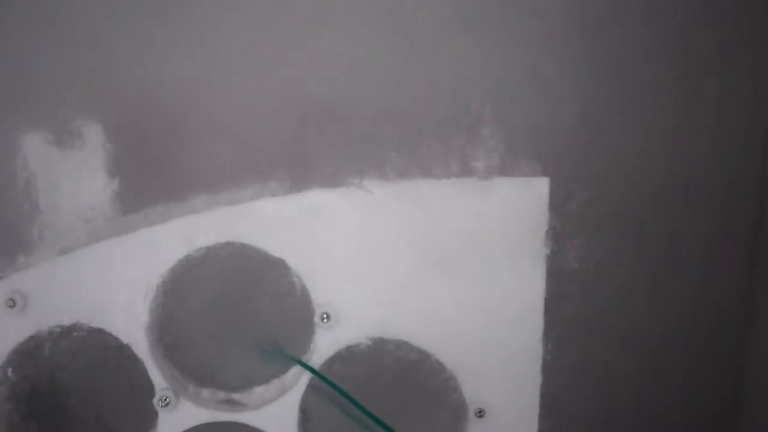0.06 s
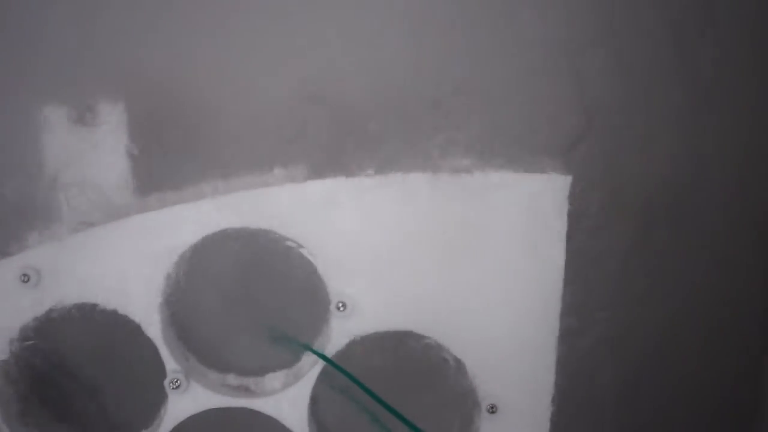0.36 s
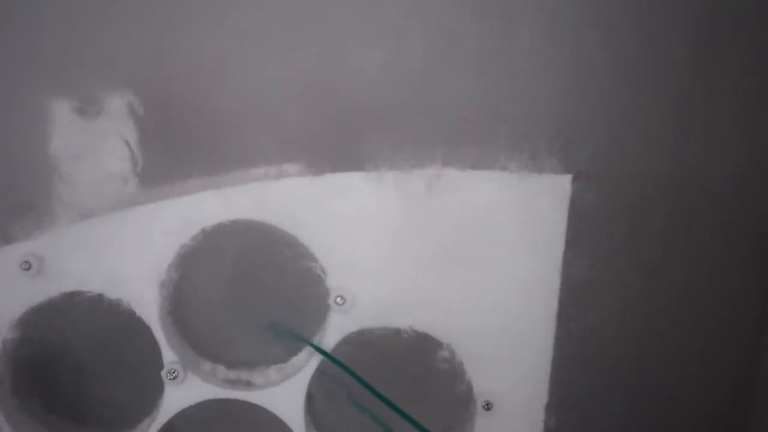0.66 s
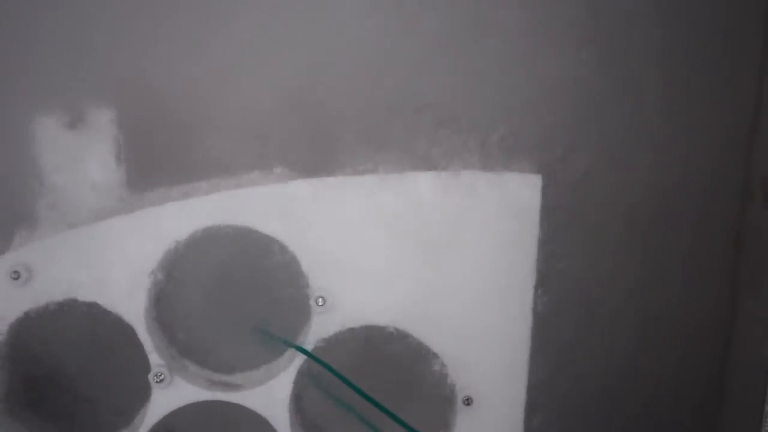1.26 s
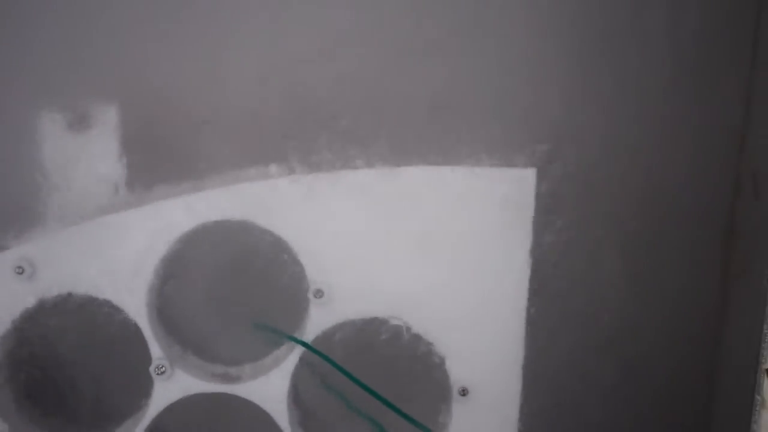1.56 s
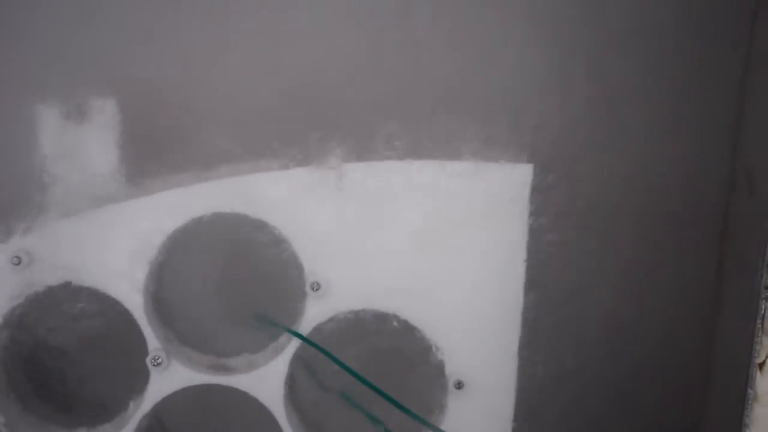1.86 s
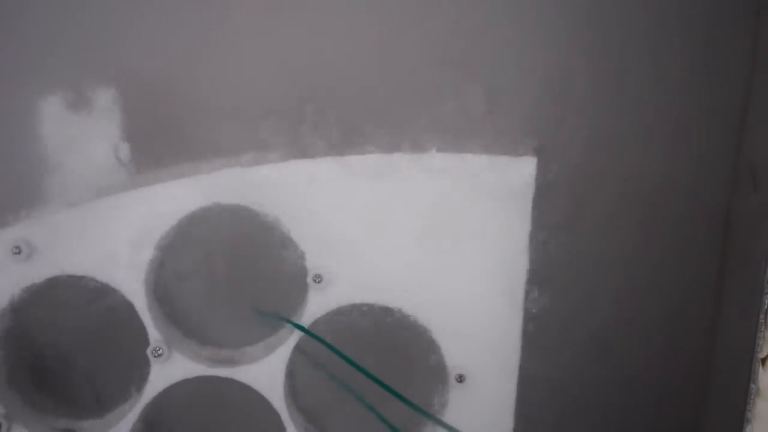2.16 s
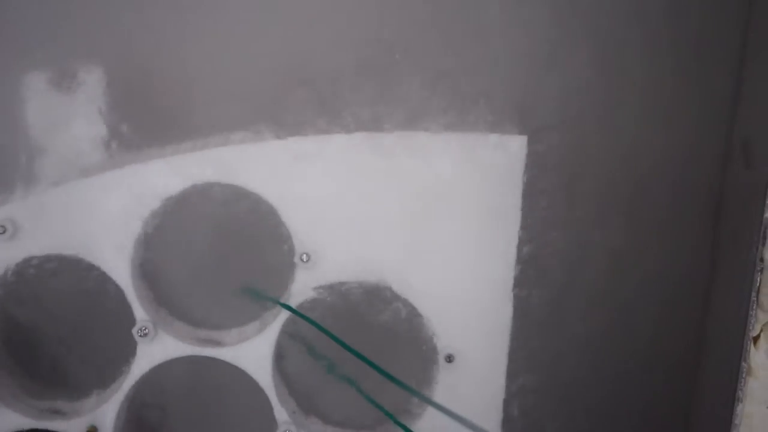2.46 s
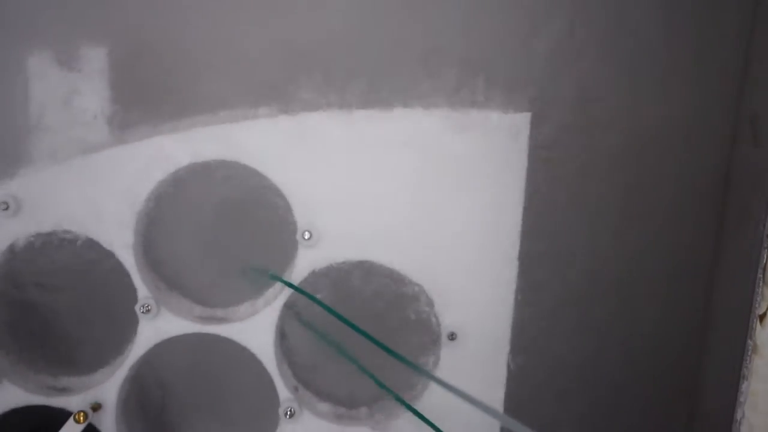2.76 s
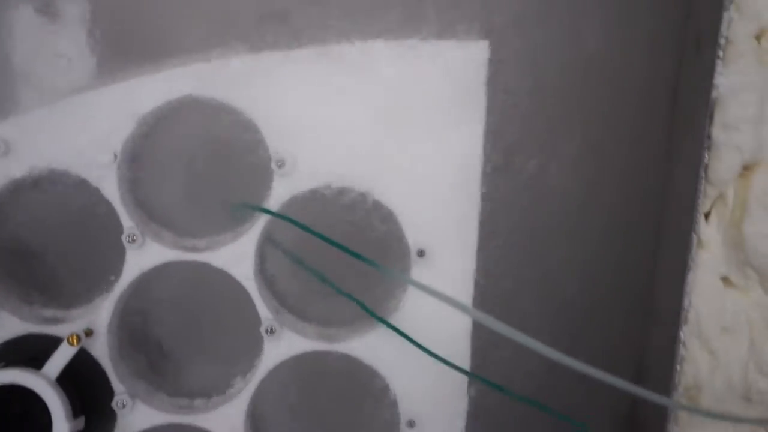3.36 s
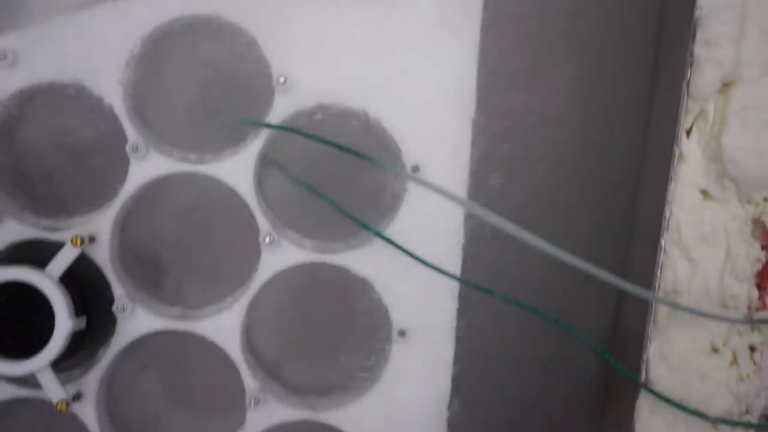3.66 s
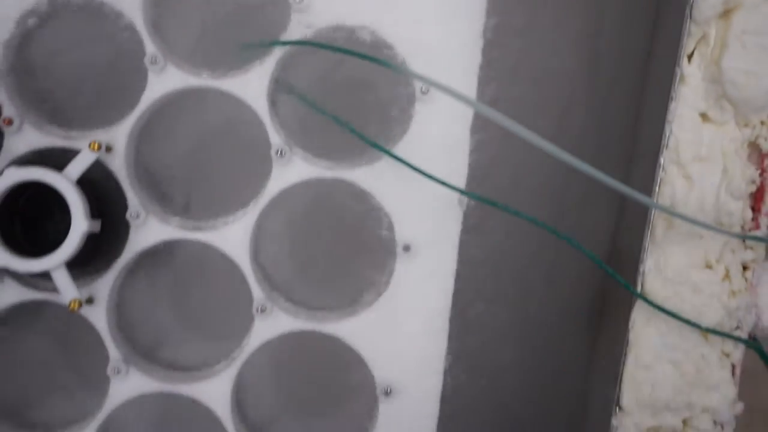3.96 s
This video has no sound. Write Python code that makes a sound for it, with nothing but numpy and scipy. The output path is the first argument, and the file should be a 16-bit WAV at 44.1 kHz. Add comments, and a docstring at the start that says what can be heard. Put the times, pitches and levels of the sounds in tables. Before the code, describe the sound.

A steady rush of machine fans fills a lab room, over an electrical hum and a thin motor whine. Small ticks and soft brushing sound near the microphone, and as it moves late on, the whine dips and shifts right.

```python
"""Laboratory machinery runs from the first moment: a wide rush of fan air, a throbbing mains hum,
a motor's comb of overtones and the thin whine of a fast rotor, which starts out on the left.
A soft brush opens the scene, and faint handling ticks and creaks dot it throughout, close by.
Around three seconds the brushing returns; then, as the microphone moves, the whine dips and
swings over to the right ear."""
import sys
import numpy as np
from scipy import signal
from scipy.fft import rfft, irfft
from scipy.io import wavfile

SR = 44100
rng = np.random.default_rng(int(sys.argv[2]) if len(sys.argv) > 2 else 0)


def digitize_waveform(pressure):
    """Quantize a signal to 16-bit integers and store it at the path in sys.argv[1].

    Rows of a 2-D input are taken as channels; values are limited to [-1, 1].
    """
    field = np.atleast_2d(pressure).T
    bounded = np.clip(field, -1, 1)
    quanta = np.round(bounded * 32767).astype(np.int16)
    wavfile.write(sys.argv[1], SR, quanta)


N = 176400
TIME, BIN_HZ = np.arange(N) / SR, np.maximum(np.arange(N // 2 + 1) * SR / N, 1)


def from_db(db):
    """Decibels to gain."""
    return 10 ** (np.asarray(db) / 20)


def in_time(rows):
    """Each column of an automation curve at every sample."""
    times, *columns = np.transpose(rows)
    return np.array([np.interp(TIME, times, column) for column in columns])


def in_pitch(rows):
    """Each column of a spectrum at every frequency bin."""
    hz, *columns = np.transpose(rows)
    return np.array([np.interp(np.log(BIN_HZ), np.log(hz), column) for column in columns])


def panned(pan_db):
    """Constant-power pan; pan_db is left minus right."""
    gains = from_db(np.array([[.5], [-.5]]) * pan_db)
    return gains / np.sqrt(np.mean(gains ** 2, axis=0))


def drift(per_s):
    """A random modulator, roughly -1 to 1, gliding to per_s new values a second."""
    knots = rng.standard_normal(4096)
    return np.interp(TIME * per_s + rng.random(), np.arange(len(knots)), knots)


def noise(spectrum):
    """Two unrelated noise spectra with the given density."""
    return rfft(rng.standard_normal((2, N))) * np.sqrt(SR / 2) * from_db(in_pitch(spectrum))


def tone(cycles, level_db, spread_rad=0):
    """A stereo sine; the room shifts its phase between the ears by spread_rad."""
    phase = 2 * np.pi * (cycles + rng.random())
    ear_shift = np.array([[.5], [-.5]]) * spread_rad * rng.choice([-1, 1])
    return np.sqrt(2) * from_db(level_db) * np.sin(phase + ear_shift)


def room_colour(spectra, diffuse, positions=6, depth_db=3, spacing_hz=34.96):
    """The moving microphone crossfades through spots in the room, each with its own peaks and dips."""
    out = 0
    for k in range(positions):
        knots = rng.standard_normal((2, 4096))
        ripple = from_db([depth_db * np.interp(BIN_HZ / spacing_hz, np.arange(4096), e) for e in knots])
        ripple /= np.sqrt(np.mean(ripple ** 2))
        nearness = np.maximum(1 - np.abs(TIME / TIME[-1] * (positions - 1) - k), 0)
        out = out + nearness * irfft(spectra * ripple ** diffuse, N)
    return rfft(out)


def flicker(spectra, bands=7, low_hz=266, high_hz=1920, depth_db=1.14):
    """Neighbouring midrange bands swell and fade, each on its own."""
    place = np.log(BIN_HZ / low_hz) / np.log(high_hz / low_hz) * (bands - 1)
    swells = 0
    for k in range(bands):
        band = irfft(spectra * np.maximum(1 - np.abs(place - k), 0), N)
        swells = swells + band * (from_db(depth_db * drift(14)) - 1)
    return spectra + rfft(swells)


# Tone colour of the air bed: pitch_hz, density_db (per Hz)
AIR_SPECTRUM = [(20, -79), (35, -76), (50, -71), (66, -64.5), (105, -70), (130, -66), (185, -74),
                (280, -73.5), (450, -73.5), (600, -70.5), (860, -70.5), (1020, -71.5), (1320, -71.5),
                (1600, -74.5), (2000, -78), (2450, -77), (2950, -75.5), (3350, -78), (3900, -81.5),
                (5900, -81), (6650, -80), (7300, -85.5), (8500, -87), (11000, -89)]
# Its stereo image: pitch_hz, correlation (0 to 1), pan_db
AIR_IMAGE = [(100, 0.98, 1), (170, .98, 0.5), (260, .88, 2), (420, 0.85, 0.5), (680, 0.7, 1.7),
             (1100, 0.62, 1.5), (1700, .3, 1), (2870, 0, 1), (4400, 0.13, 1.5), (6500, 0.3, -1),
             (8500, 0.3, -3), (11000, 0.34, -4)]
# Fader rides on its rumble, mids and hiss: time_s, gain_db
RUMBLE_RIDE = [(0, 1.5), (.9, -2.5), (1.8, 3.3), (2.4, 0.5), (2.95, 2.2), (3.3, -2), (4, -4.5)]
MID_RIDE = [(0, 0.1), (.45, -0.4), (.7, -0.3), (1.6, 0), (2.3, -0.2), (2.6, -0.5), (2.85, 1.2), (3.1, -.3),
            (3.4, -1.5), (3.7, 0.1), (4, -0.2)]
HISS_RIDE = [(0, 0.054), (.7, -0.022), (1.4, -0.072), (2.05, -.5), (2.55, .4), (3.1, 0.093), (3.45, 0),
             (3.75, .4), (4, .4)]


def fan_air(rumble_hz=130, hiss_hz=1690):
    """Fan rush, nearly mono in the bass and diffuse in the treble."""
    correlation, pan_db = in_pitch(AIR_IMAGE)
    mid, side = noise(AIR_SPECTRUM)
    rush = np.sqrt((1 + correlation) / 2) * mid + np.sqrt((1 - correlation) / 2) * side * [[1], [-1]]
    rush = flicker(room_colour(panned(pan_db) * rush, diffuse=1 - correlation ** 2))
    low, below_hiss = (1 / (1 + (BIN_HZ / hz) ** 6) for hz in (rumble_hz, hiss_hz))
    zones = (low, RUMBLE_RIDE), (below_hiss - low, MID_RIDE), (1 - below_hiss, HISS_RIDE)
    return sum(irfft(rush * share, N) * from_db(in_time(ride)) for share, ride in zones)


# Low drones of other machines: pitch_hz
DRONE_HZ = [41.4, 82.8, 95.4, 103.5, 124.2]
# The same drones before the rumble ride: level_db
DRONE_DB = [-60, -48, -59.5, -50, -53]


def hum(mains_hz=120.03, mains_db=-39, waver_db=.9):
    """Mains hum throbs as it beats with low machine drones, which swell with the rumble."""
    mains = tone(mains_hz * TIME, mains_db - waver_db * drift(5.5))
    drones = sum(tone(hz * TIME, db + in_time(RUMBLE_RIDE) - waver_db * drift(5))
                 for hz, db in zip(DRONE_HZ, DRONE_DB))
    return mains + drones


def fan_tone(pitch_hz=783.5, ears_db=(-51.5, -58.5), waver_db=.5):
    """A fan's faint, wavering note, left of centre."""
    return tone(pitch_hz * TIME, np.vstack(ears_db) + waver_db * drift(4), spread_rad=.93)


# The motor's comb: shaft_multiple, left_db, right_db
MOTOR_OVERTONES = [(4, -61, -62), (5, -54, -55), (6, -59, -60), (7, -58, -58), (8, -61, -61), (9, -60, -60),
                   (10, -60, -62), (11, -51.5, -56), (12, -61, -68), (13, -54, -56), (14, -59, -57),
                   (15, -56, -57), (21, -57.5, -57.5), (22, -57, -61), (23, -63, -57), (24, -70, -63),
                   (29, -63, -66), (37, -62, -67), (38, -55, -67), (41, -60, -69), (42, -70, -62),
                   (43, -61, -65), (44, -56.5, -66), (45, -65, -60), (47, -60, -66), (48, -72, -63),
                   (49, -56.5, -62), (50, -60, -66), (51, -61, -69), (57, -66, -73), (60, -65, -65)]


def motor(shaft_hz=28.856, wander_hz=.0081, waver_db=.8):
    """Overtones of one shaft, each wavering a little in the room."""
    turns = np.cumsum(shaft_hz + wander_hz * drift(2.08)) / SR
    return sum(tone(multiple * turns, np.vstack(ears_db) + waver_db * drift(2.5), multiple / 35)
               for multiple, *ears_db in MOTOR_OVERTONES)


# Tone colour of the brushing: pitch_hz, density_db (per Hz)
BRUSH_SPECTRUM = [(500, -90), (1500, -72.5), (3000, -81.5), (5000, -84.5), (8000, -82.5), (11000, -83)]
# Brush strokes: centre_s, half_length_s, gain_db
BRUSH_STROKES = [(.2, 0.22, -11), (2.92, 0.11, -6), (3.667, 0.071, -1), (3.72, 0.33, -9)]


def brushing(grain_db=2.5, pan_db=-6.5):
    """Soft swells of grainy noise, close by on the right."""
    power = sum(from_db(db) ** 2 * np.exp(-((TIME - centre_s) / half_s) ** 2)
                for centre_s, half_s, db in BRUSH_STROKES)
    strokes = irfft(noise(BRUSH_SPECTRUM), N) * np.sqrt(power)
    return strokes * from_db(grain_db * drift(300)) * panned(pan_db)


def tick(start_s, level_db, pitch_hz, t60_s, pan_db, crack_db=-6, crack_s=.0008):
    """A tiny, dulled crack and three neighbouring modes that die quickly."""
    t = np.arange(SR // 20) / SR
    modes_hz = pitch_hz * np.array([[.85], [1], [1.15]])
    modes = np.sin(2 * np.pi * modes_hz * t + rng.uniform(-1, 1, (2, 3, 1)))
    ring = np.array([.5, 1, .5]) @ modes / np.sqrt(2) * from_db(-60 * t / t60_s)
    crack = from_db(crack_db) * rng.standard_normal((2, len(t))) * np.exp(-t / crack_s)
    crack = signal.sosfilt(signal.butter(2, min(1.5 * pitch_hz, SR / 3), fs=SR, output="sos"), crack)
    out, start = np.zeros((2, N + SR)), int(start_s * SR)
    out[:, start:start + len(t)] = from_db(level_db) * panned(pan_db) * (ring + crack)
    return out[:, :N]


def creaks(per_s=12, level_db=-45, low_hz=1150, high_hz=3450):
    """Very faint creaks, each one tick at a random time, pitch and pan."""
    out = 0
    for when, size, pitch, place in rng.random((int(per_s * N / SR), 4)):
        hz = low_hz * (high_hz / low_hz) ** pitch
        out = out + tick(when * N / SR, level_db + 2 * size - 1, hz, t60_s=.009, pan_db=10 * place - 5)
    return out


# Cue list of ticks and soft taps: start_s, level_db, pitch_hz, t60_s, pan_db
TICK_CUES = [(0.1247, -23.5, 2750, .008, -11), (0.2837, -26, 7700, 0.0072, -3), (.2873, -27, 8800, .005, 2),
             (.2897, -31, 9200, .003, -6), (.465, -29.5, 716, 0.031, -1), (0.939, -29, 1200, 0.031, 0),
             (0.999, -30, 2600, 0.014, -3), (1.258, -29, 1740, 0.031, 2), (1.3982, -26, 10200, 0.0027, -7),
             (1.4035, -26.5, 2600, 0.0082, -7), (1.427, -27, 2050, .01, -4), (1.4673, -29, 1780, 0.023, -3),
             (1.585, -33, 9000, .004, -2), (2.205, -27, 696, 0.029, -1), (2.375, -30, 920, 0.036, 2),
             (2.461, -30.5, 4450, .008, 4), (3.21, -34, 1810, 0.028, 0), (3.2862, -26, 2100, .009, 1),
             (3.3667, -28, 2880, .007, -6), (3.925, -29, 8000, .004, -4)]


def handling():
    """Things handled close by give small ticks and taps."""
    return sum(tick(*cue) for cue in TICK_CUES)


# The whine at the moving microphone: time_s, left_db, right_db
WHINE_RIDE = [(0, -54, -70), (.17, -42.5, -47), (.55, -40.5, -45.5), (.85, -43.5, -52), (1.9, -44, -48.5),
              (2.65, -45.5, -60), (2.95, -44.5, -52), (3.15, -45.5, -63), (3.4, -54.5, -49.5),
              (3.65, -68, -47.5), (3.78, -65, -36.5), (3.9, -47, -38.5), (4, -43, -40)]


def rotor_whine(pitch_hz=1500.3, octave_db=(-56, -62), octave_waver_db=5.5):
    """A fast rotor and its octave, heard through the room's standing waves."""
    cycles = pitch_hz * TIME
    octave_ride = np.vstack(octave_db) + octave_waver_db * np.array([drift(4.5), drift(4.3)])
    return tone(cycles, in_time(WHINE_RIDE), spread_rad=.86) + tone(2 * cycles, octave_ride, 2.3)


def scene():
    """The machine bed with the close sounds on top."""
    machines = fan_air() + motor() + hum() + fan_tone() + rotor_whine()
    return machines + handling() + brushing() + creaks()


def record(dry):
    """A steep high cut on the whole mix."""
    cutoff_hz = 11080
    return signal.sosfilt(signal.ellip(12, .1, 80, cutoff_hz, fs=SR, output="sos"), dry)


dry = scene()
out = record(dry)
digitize_waveform(out)
```